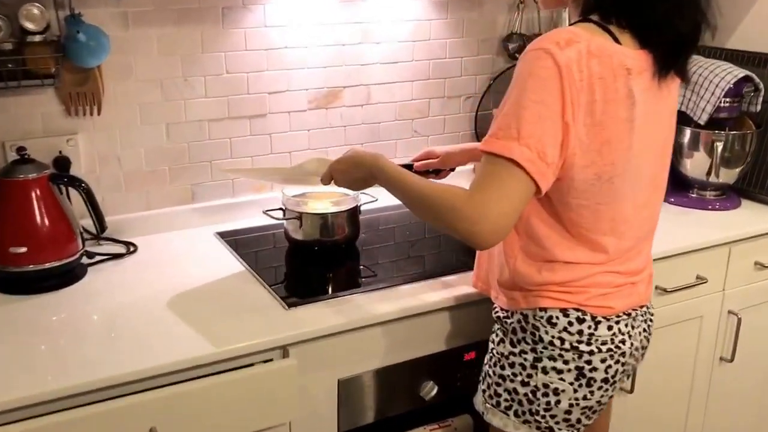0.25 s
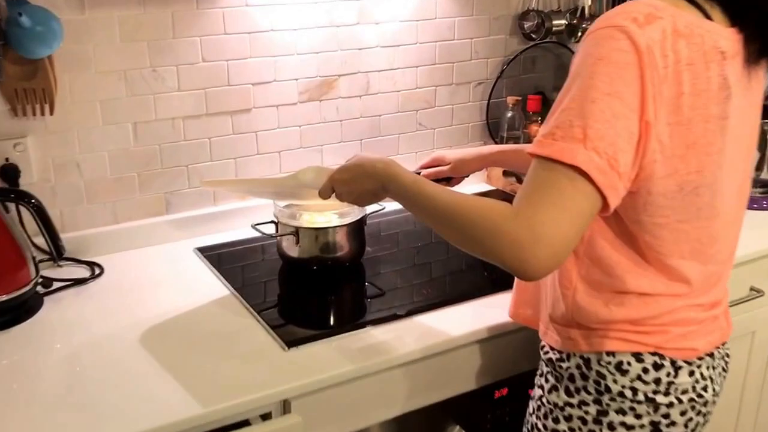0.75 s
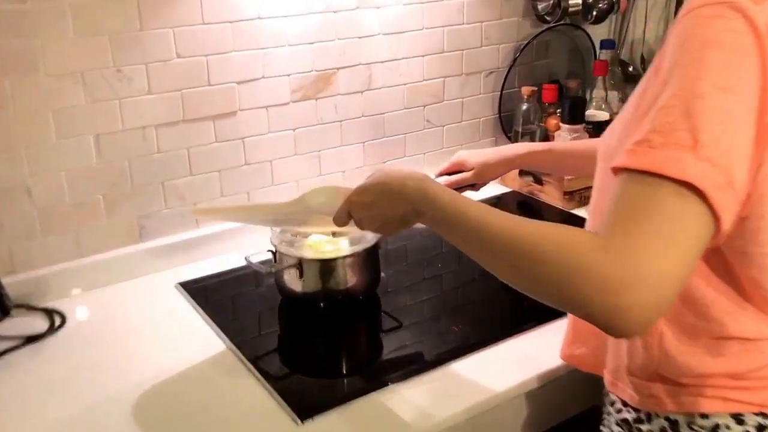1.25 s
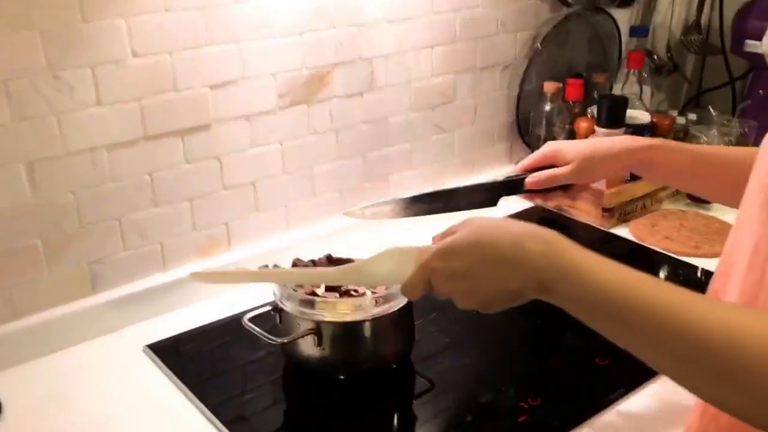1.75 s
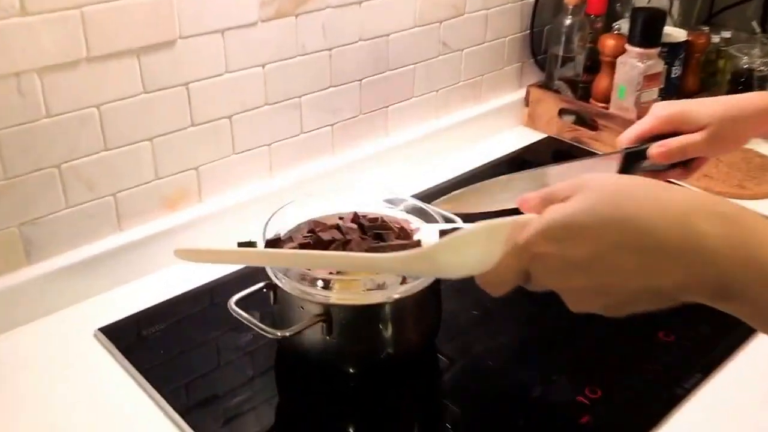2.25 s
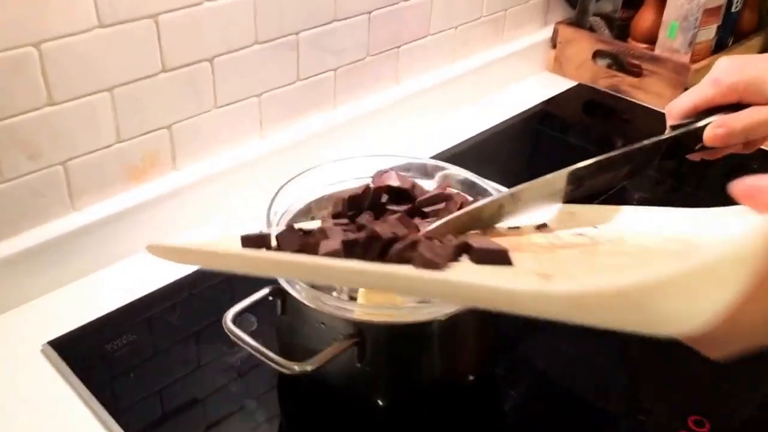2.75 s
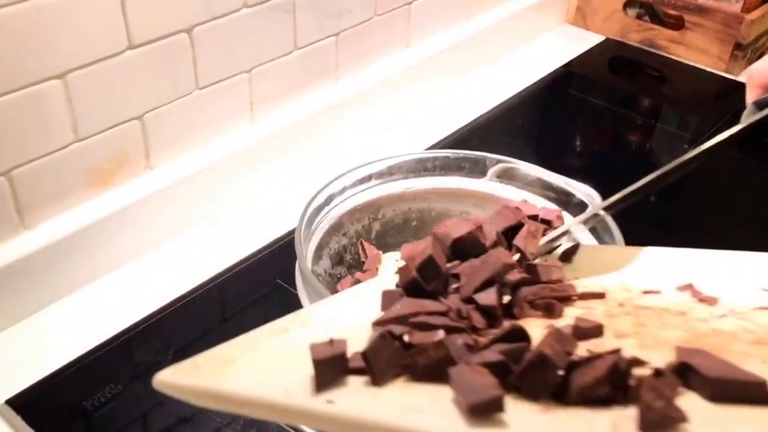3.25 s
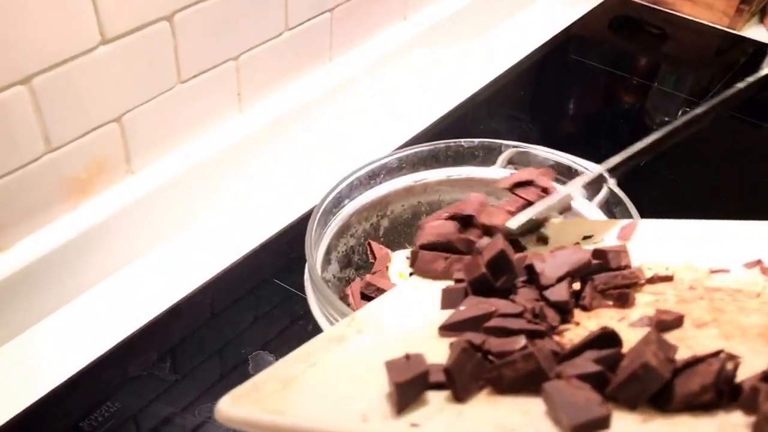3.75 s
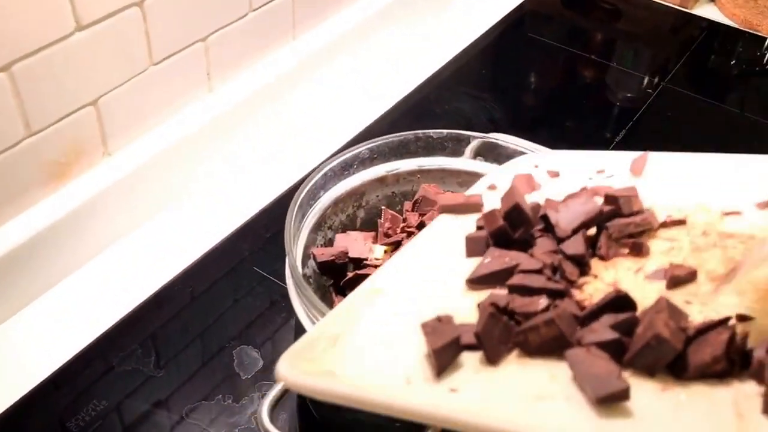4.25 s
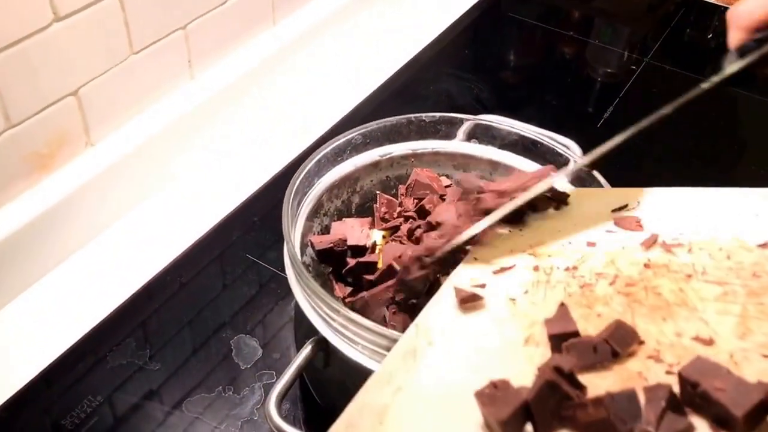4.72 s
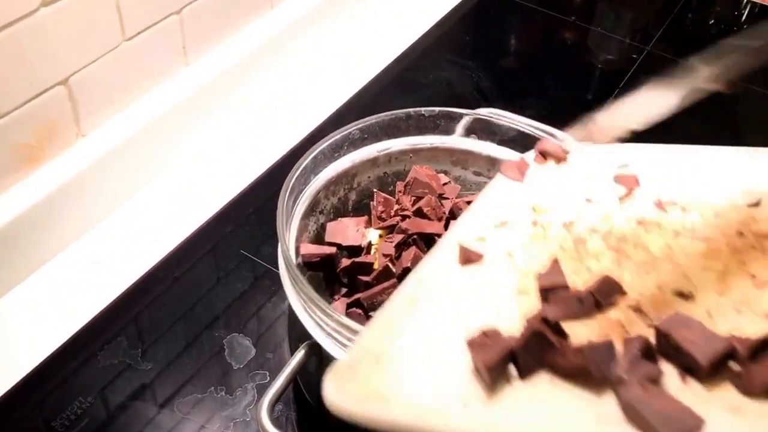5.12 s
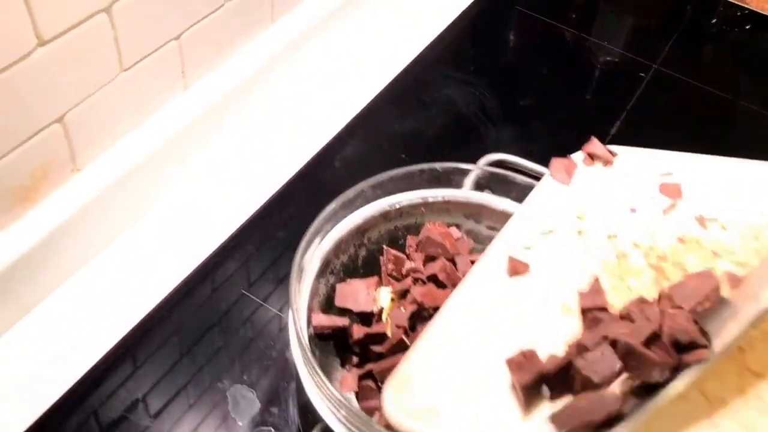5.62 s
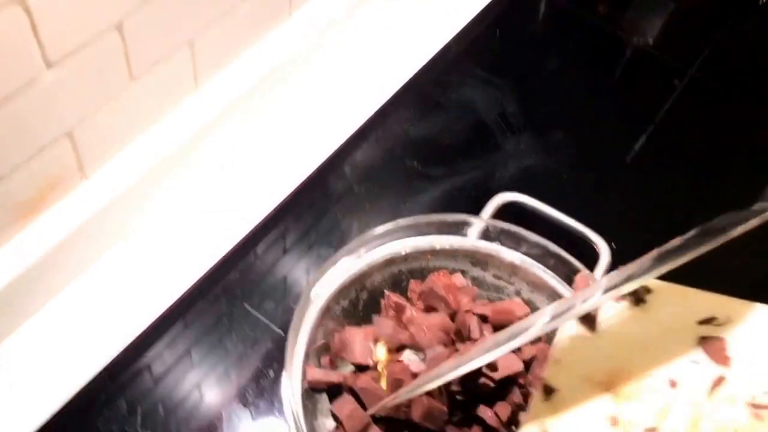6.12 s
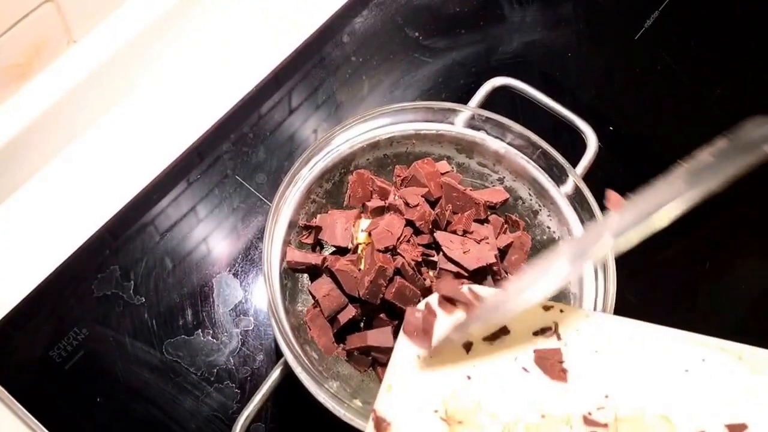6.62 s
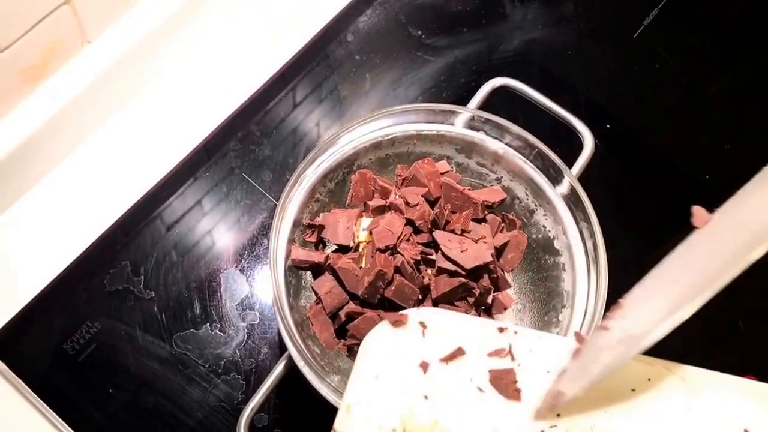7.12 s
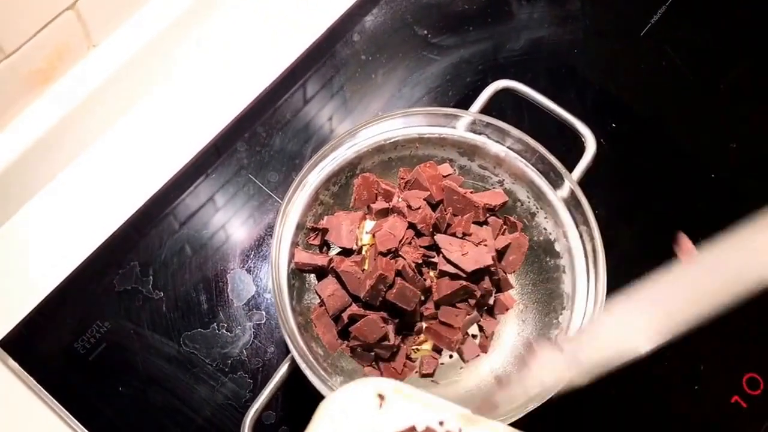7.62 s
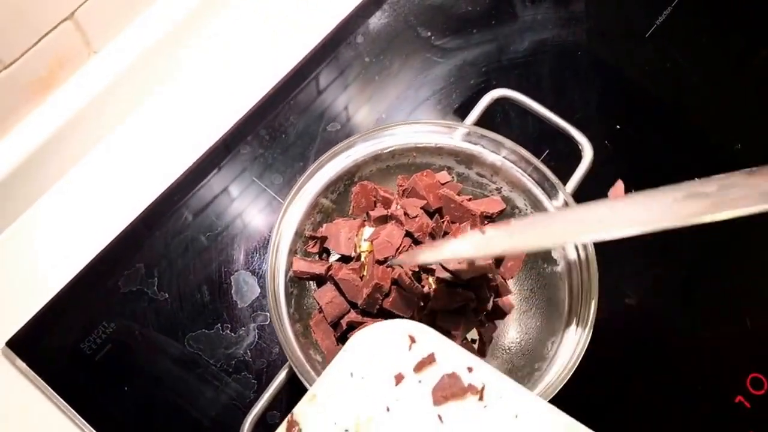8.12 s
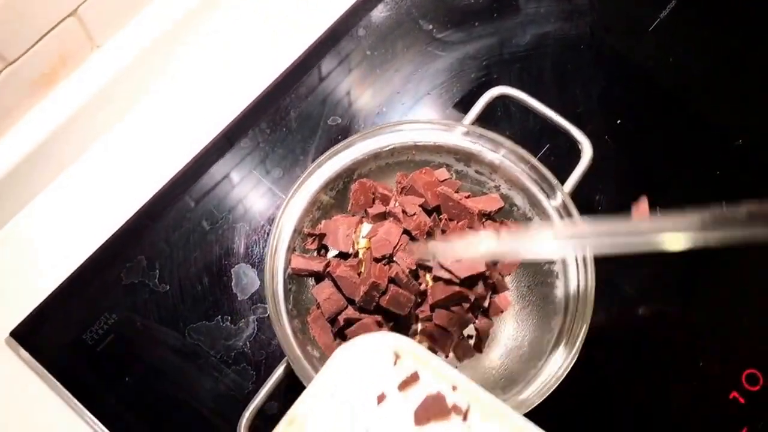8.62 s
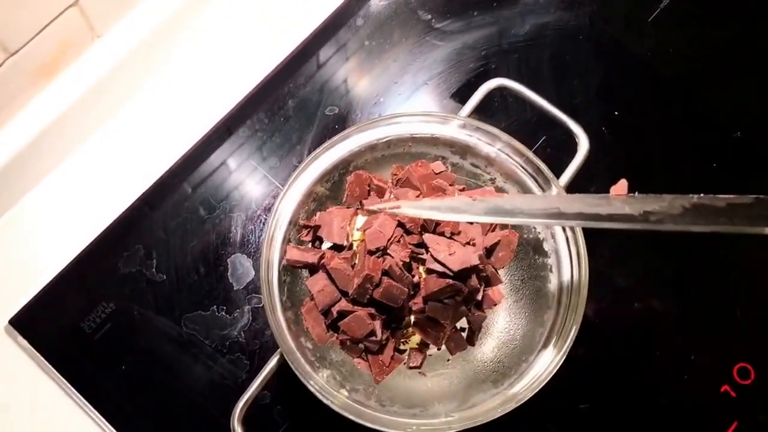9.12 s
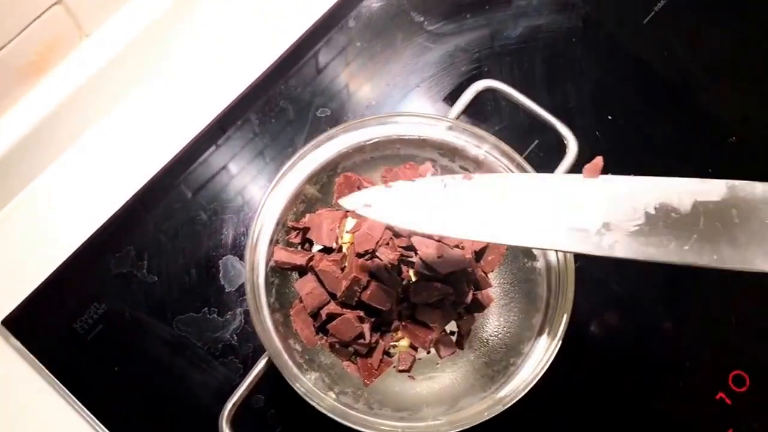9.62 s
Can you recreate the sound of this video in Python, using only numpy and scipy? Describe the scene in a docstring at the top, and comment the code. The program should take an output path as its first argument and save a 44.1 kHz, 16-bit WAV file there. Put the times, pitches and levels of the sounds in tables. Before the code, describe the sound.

Roomy, soft footsteps come first as the microphone approaches a stove. From about two and a half seconds, dry, close scrapes of a knife on a plastic board come in uneven bursts, mixed with dull hollow taps and one hard knock past the middle. Low electric hum, faint high whine and fan air continue beneath. After a pause, a quick cluster of short glassy clinks ends the work.

```python
"""Chopped chocolate pushed into a bowl

A few slippered steps slap and scuff a kitchen floor (shaped noise bursts in a reverberant room), then a
knife pushes chopped chocolate off a plastic board into a glass bowl on a pot. Grit drives resonances of
board and blade, knocks ring decaying modes, and crumbs tick as short bright noise. At last the blade
clinks on the rim, with a dull noise tail and a short note. A hob hums, whines and rumbles over a fan."""
import sys
import numpy as np
from scipy import signal
from scipy.fft import rfft, irfft
from scipy.io import wavfile
from scipy.ndimage import uniform_filter1d

SR = 44100
rng = np.random.default_rng(int(sys.argv[2]) if len(sys.argv) > 2 else 0)


def rack_gain(trim_db):
    """Turn a fader trim in dB into the linear factor to multiply a signal by."""
    fader = np.asarray(trim_db, float)
    return 10 ** (fader / 20)


def file_out(sig):
    """Save sig as 16-bit WAV at sys.argv[1]."""
    # one column per channel
    cols = np.atleast_2d(sig).T
    # limit, then scale
    lim = np.clip(cols, -1, 1)
    pcm = np.round(lim * 32767).astype(np.int16)
    wavfile.write(sys.argv[1], SR, pcm)


N = 434826
T = np.arange(N) / SR

# resonances of the plastic board: (frequency [Hz], width [Hz], level [dB])
BOARD = [(176, 19.5, -5.5), (290, 29.4, 1.5), (528, 41, 4.5), (710, 69, -1.5), (848, 52, -5.5),
         (1040, 52, 2), (1280, 39, -4.5), (1460, 91, 1), (1668, 42, -6.5), (1879, 66, 0.5),
         (2480, 340, -13.5), (2940, 67, -4.5), (3120, 110, -17), (3300, 130, -8.5)]
# blade on the rim: (time [s], peak [dB], centre of the ring [Hz], tick setting [dB], thud setting [dB])
CLINKS = [(9.297, -13.5, 1560, -14.5, -25), (9.339, -6, 1900, -9, -40), (9.398, -15.5, 2100, -20, -20.5),
          (9.416, -24, 1330, -21, -27), (9.473, -31, 1570, -20, -29), (9.549, -1.5, 1270, -12, -24)]

FLEX_HZ = 420  # modes below this are the flexing ones
REACH_S = 0.001407  # delay of each blow after its listed time
PRESS_RISE_S, SLIDE_RISE_S, LIFT_S = 0.0026, 0.0073, 0.0095  # pressure comes at once, the slide speeds up


def unit(x):
    """Normalisation: scale to rms 1."""
    return x / np.sqrt(np.mean(x ** 2))


def colour(x, points):
    """Spectral shaping: filter by (frequency [Hz], gain [dB]) points joined on a log axis."""
    hz, db = np.transpose(points)
    f = np.fft.rfftfreq(len(x), 1 / SR) + 1
    gain = rack_gain(np.interp(np.log(f), np.log(hz), db))
    return irfft(rfft(x) * gain, len(x))


def ring(x, modes, centre_hz=None, spread_oct=1., wander_db=0.):
    """Forced resonance: x drives each mode; given a centre, near modes speak most and each level wanders."""
    out = 0
    for k, (hz, width, db) in enumerate(modes):
        if centre_hz is not None:
            distance = np.log2(hz / centre_hz) / spread_oct
            db = db + wander_db * walk(25) - np.minimum(6 * distance ** 2, 14)
        resonator = signal.iirpeak(hz, hz / width, SR)
        out = out + (-1) ** k * signal.lfilter(*resonator, rack_gain(db) * x)
    return out


def walk(rate):
    """Slow random modulation: levels held 1 / rate s and slewed twice; spread near 1."""
    k = int(SR / rate)
    held = np.repeat(rng.standard_normal(N // k + 1), k)
    return 1.328 * uniform_filter1d(uniform_filter1d(held, k), k)[:N]


def add(out, s, x):
    """Superposition: mix x into out at time s."""
    i = int(s * SR)
    out[i:i + len(x)] += x[:N - i]


def room(x):
    """Diffuse reverberation: octave bands of noise swell briefly, then each decays at its own rate."""
    # kitchen reverberation: (frequency [Hz], time to fall 60 dB [s])
    decay_times = [(200, 0.87), (1200, 0.72), (4000, 0.7), (12000, 1)]
    t = T[:SR]
    hz, t60 = np.transpose(decay_times)
    tail = 0
    for mid in 125 * 2. ** np.arange(7):
        upper = mid * np.sqrt(2) * (1.4 if mid > 7000 else 1)
        sos = signal.butter(2, [mid / np.sqrt(2), upper], "band", fs=SR, output="sos")
        band = signal.sosfilt(sos, rng.standard_normal(SR))
        tail = tail + band * rack_gain(-60 * t / np.interp(np.log(mid), np.log(hz), t60))
    tail = tail * np.clip(t / 0.0067, 0, 1)
    return signal.fftconvolve(x, tail / np.sqrt(np.sum(tail ** 2)))[:N]


def steps():
    """Impact noise: a sole's gritty burst swells and rattles out, ringing a damped hollow resonance."""
    # slipper slaps on the floor: (time [s], level setting [dB], treble setting [dB], thump setting [dB])
    slaps = [(0.001, -30, -11, -12), (0.09, -29, -17, 5), (0.139, -30, -11, -9), (0.259, -34.5, -4, -41),
             (0.502, -24, -19, -23), (0.519, -22, -16, -15.5), (0.565, -31, -12, -11),
             (0.677, -30.5, -12.5, -2.5), (0.798, -30.5, -11, -24), (1.114, -32.5, -16, -20),
             (1.164, -27, -20, -18), (1.402, -33, -15, -19), (1.428, -32, -13, -47),
             (1.733, -29.5, -12.5, -21), (1.777, -27.5, -19, -21), (2.011, -36, -9.5, -38),
             (2.297, -27, -16, -18)]
    # spectrum of a slap: (frequency [Hz], gain [dB])
    floor_slap = [(71, -59), (120, 7), (316, -2), (365, 0.5), (642, -5.5), (725, -5.5), (802, -3),
                  (1760, -7), (1910, -4.5), (2200, -13.5), (15000, -49.5)]
    hollow_hz, scatter_oct, rise_s, t60_s = 779, 0.3, 0.0049, 0.24
    out, t = np.zeros(N), T[:SR // 2]
    for s, db, treble_db, thump_db in slaps:
        shape = [(60, -30), (100, thump_db + 9), (250, thump_db + 12), (400, -1.5), (2000, 3.5),
                 (5000, treble_db + 21.0)]
        noise = colour(colour(rng.standard_normal(len(t)), floor_slap), shape)
        hz = hollow_hz * 2 ** (scatter_oct * rng.standard_normal())
        noise = unit(noise + ring(noise, [(hz, 150, 4)]))
        envelope = (1 - np.exp(-t / rise_s)) * rack_gain(-60 * t / t60_s)
        add(out, s, rack_gain(db - 7.5) * noise * envelope)
    return out * rack_gain(3 * walk(60))


def hob():
    """Mains excitation: a wavering twice-mains hum, with narrow bands of coil whine and a low rumble."""
    # how near the hob is: (time [s], level [dB])
    nearness = [(0, -11), (1, -15.5), (1.7, -13), (2.33, -4.5), (2.75, 0), (4, 0), (5, -0.5), (6.5, -0.5),
                (7.8, -1), (9.5, -0.5), (9.86, -1.5)]
    # coil whine: (frequency [Hz], width [Hz], level [dB])
    whine_bands = [(12700, 68, -15), (13000, 120, -20), (13420, 130, -17)]
    hum_hz = 99
    hum_db, rumble_db, whine_db = -46.5, -53, -71.5  # close by
    rumble_share, whine_share = 0.46, 0.29  # how much of the nearness each follows
    near_db = np.interp(T, *np.transpose(nearness))
    phase = 2 * np.pi * np.cumsum(hum_hz + 1.514 * walk(8.8)) / SR
    hum = np.sqrt(2) * np.sin(phase) * rack_gain(1.5 * walk(15) + 0.37 * walk(3.04))
    whine = ring(ring(rng.standard_normal(N), whine_bands), [(13300, 1500, 0)])
    whine = unit(whine) * rack_gain(1.8 * walk(6))
    rumble = unit(colour(rng.standard_normal(N), [(24, -62), (31, -4), (38, 5), (70, 1.0), (110, -16),
                                                  (130, -46), (200, -82)]))
    out = rack_gain(hum_db + near_db) * hum
    out = out + rack_gain(whine_db + whine_share * near_db) * whine
    return out + rack_gain(rumble_db + rumble_share * near_db) * rumble


def fan():
    """Broadband flow noise: air of the hob fan and the room, its level wandering, under a thin hiss."""
    # spectrum of the air: (frequency [Hz], gain [dB])
    air_spectrum = [(68, -38), (115, -5), (129, -6.5), (210, -14.5), (236, -15.5), (298, -17), (432, -26.5),
                    (662, -22), (903, -23.5), (958, -23), (1680, -22.5), (1890, -26.5), (2130, -27.5),
                    (4720, -41), (12000, -53.5), (15600, -104), (22000, -120)]
    air = unit(colour(rng.standard_normal(N), air_spectrum)) * rack_gain(-53 + 1.6 * walk(3.42))
    hiss = unit(colour(rng.standard_normal(N), [(8000, -75), (11500, -6), (15500, -8)])) * rack_gain(-76.5)
    return air + hiss


def scuffs():
    """Friction noise: short gritty hisses ring the sole's resonances, strongest near a centre of their own."""
    # soles scuff as they land or lift: (time [s], level [dB], centre [Hz], time to fall 60 dB [s])
    scuff_events = [(0.144, -56, 8000, 0.34), (0.252, -59, 5000, .4), (0.52, -54, 10000, 0.35),
                    (0.8, -52, 3800, .4), (1.17, -60, 11000, .25), (1.301, -52.5, 7950, 0.12),
                    (1.428, -51.5, 4000, 0.43), (1.545, -57, 10000, 0.054), (1.779, -56.5, 11000, .25),
                    (2.3, -56, 10000, .25)]
    # resonances of the sole: (frequency [Hz], width [Hz], level [dB])
    sole = [(2100, 200, -2), (2600, 200, 4), (3550, 160, 5.5), (4330, 200, 3), (5000, 200, 0),
            (6160, 270, 3), (7340, 300, 0), (8800, 400, 0), (9930, 400, -0.5), (11600, 500, 1),
            (14000, 600, -1)]
    spread_oct, rise_s = 0.62, .004
    out, t = np.zeros(N), T[:SR // 3]
    for s, db, hz, t60_s in scuff_events:
        modes = [(f, width, g - 6 * (np.log2(f / hz) / spread_oct) ** 2) for f, width, g in sole]
        hiss = unit(ring(rng.standard_normal(len(t)), modes))
        add(out, s, rack_gain(db - 60 * t / t60_s) * (1 - np.exp(-t / rise_s)) * hiss)
    return out * rack_gain(3.8 * walk(80))


def hold(s, length_s, rise_s):
    """Exponential approach and release: rise from s, hold for the length, die as the blade lifts."""
    rise = 1 - np.exp(-np.maximum(T - s, 0) / rise_s)
    return rise * np.exp(-np.maximum(T - s - length_s, 0) / LIFT_S)


def pushes():
    """Contact force: pressure, bending and moving resonance centre as the blade bears down on the board."""
    # (start [s], length [s], pressure [dB], board ring centre [Hz], bending relative to pressure [dB])
    strokes_down = [(2.411, 0.045, -36.5, 775, -4.5), (2.459, 0.11, -34.5, 1060, -25),
                    (2.563, .17, -41.5, 845, -15.5), (2.737, .2, -45, 1010, -16),
                    (2.949, 0.14, -51.5, 644, -17), (3.12, 0.075, -50, 880, -20),
                    (3.595, 0.13, -51.5, 770, -8.5), (3.81, 0.036, -50.5, 970, -15),
                    (3.884, .06, -51.5, 980, -7), (4.354, 0.036, -36, 630, -16),
                    (4.416, 0.049, -47.5, 1320, -13.5), (4.529, 0.093, -47.5, 1150, -25),
                    (4.725, 0.11, -46, 740, -6.5), (4.805, 0.11, -49.5, 820, -9),
                    (5.235, 0.085, -63, 1000, -12), (5.39, 0.081, -49.5, 705, -17),
                    (5.483, .1, -35, 1300, -13.5), (5.573, 0.019, -26.5, 1450, -11),
                    (5.598, 0.091, -34, 1410, -10.5), (5.706, 0.14, -39, 1150, -14.5),
                    (5.862, 0.093, -36, 1380, -20), (5.993, 0.04, -47, 985, -1),
                    (6.428, .08, -38.5, 950, -13), (6.51, 0.041, -34.5, 1100, -10),
                    (6.559, .095, -39.5, 1160, -6.5), (7.159, 0.045, -35, 1100, -7),
                    (7.218, .055, -39.5, 940, -2.5), (7.276, .05, -35.5, 1150, -5),
                    (7.324, 0.036, -34, 1250, -8.5), (7.77, 0.048, -42, 960, -0.5),
                    (7.827, 0.043, -39, 1090, -9), (7.867, 0.14, -42.5, 945, 0),
                    (8.517, 0.058, -41.5, 1020, -5.5), (9.298, 0.025, -37, 1500, -16),
                    (9.336, 0.088, -36.5, 1300, -8.5), (9.436, 0.068, -50, 1250, -3)]
    climb_oct_per_s = 1.3  # the board rings higher as the blade nears its edge
    press, bend, board_hz = np.zeros(N), np.zeros(N), np.full(N, 1000.)
    for s, length_s, db, centre_hz, bend_db in strokes_down:
        shape = rack_gain(db) * hold(s, length_s, PRESS_RISE_S)
        press = np.hypot(press, shape)
        bend = np.hypot(bend, rack_gain(bend_db) * shape)
        on = T >= s
        since_middle = np.minimum(T[on] - s, length_s) - length_s / 2
        board_hz[on] = centre_hz * 2 ** (climb_oct_per_s * since_middle)
    return press, bend, board_hz


def slides():
    """Sliding friction: levels of the edge's hiss and its top; each slide has its own brightness."""
    # the edge slides over the scored surface: (start [s], length [s], hiss [dB], brightness setting [dB])
    slide_events = [(2.446, 0.036, -47.5, 0), (2.463, 0.11, -42.5, 1), (2.56, 0.28, -53, 9),
                    (2.819, 0.05, -49.5, 0), (2.884, .045, -48.5, 10), (3.13, 0.05, -61, 0),
                    (2.943, 0.053, -63, -3), (3.577, 0.24, -62.5, 5), (4.366, 0.042, -43.5, 12),
                    (4.421, 0.046, -50, 11), (4.556, 0.022, -40.5, 0), (4.594, 0.035, -60, 7),
                    (4.642, 0.08, -64, 29), (5.217, .06, -59, -15), (5.38, 0.047, -63, 5),
                    (5.439, 0.026, -50.5, -10), (5.476, 0.087, -40, 0), (5.56, 0.13, -41.5, -7),
                    (5.692, .17, -46, -7), (5.868, 0.073, -41, 3), (5.947, 0.042, -64, 7),
                    (6.456, 0.191, -44, 11), (6.714, 0.053, -58.5, -15), (6.984, 0.06, -56.5, -17),
                    (7.172, 0.039, -49, -2), (7.188, 0.17, -44.5, 6), (7.82, .04, -55, -4),
                    (7.852, 0.15, -46, 6), (8.495, 0.029, -50, 7), (8.534, 0.031, -44.5, 4),
                    (9.336, 0.089, -42.5, -23), (9.428, 0.055, -55, -7)]
    slide, top = np.zeros(N), np.zeros(N)
    for s, length_s, db, bright_db in slide_events:
        shape = rack_gain(db) * hold(s, length_s, SLIDE_RISE_S)
        slide = np.hypot(slide, shape)
        top = np.hypot(top, rack_gain(bright_db + 0.97 * (db + 31)) * shape)
    return slide, top


def strokes():
    """Stick-slip excitation: the edge catches on the scored surface; uneven grit rings board and blade."""
    # resonances of the blade: (frequency [Hz], width [Hz], level [dB])
    blade = [(3860, 350, -3.5), (4150, 80, 7), (5400, 85, -17), (5360, 62, 1), (6020, 350, -4),
             (6500, 110, -10), (6940, 170, 0), (7900, 290, 5.5), (8840, 370, 2), (9500, 93, -11),
             (11960, 360, 1)]
    # the blade squeaks in some strokes: (start [s], length [s], level [dB])
    squeaks = [(4.812, .03, -56), (7.265, .09, -47), (7.92, .07, -45), (8.54, .022, -43)]
    # resonances of the squeak: (frequency [Hz], width [Hz], level [dB])
    squeak_ring = [(4170, 110, 0), (2500, 80, -10)]
    press, bend, board_hz = pushes()
    slide, top = slides()
    # about 1500 stronger grains a second stand out of the noise
    grit = rng.standard_normal(N) * (1 + 2.3 * (rng.random(N) < 1500 / SR))
    grit = grit * rack_gain(1.4 * walk(45) + 1.58 * walk(300))
    # slow bending of the board flickers
    flex = ring(grit, [m for m in BOARD if m[0] < FLEX_HZ]) * rack_gain(3 * walk(15))
    body = ring(grit, [m for m in BOARD if m[0] > FLEX_HZ], board_hz, 0.81, 2.95)
    body = body + colour(grit, [(300, -70), (500, -16.5), (1500, -12), (3000, -25), (5000, -76)])
    blade_hz = 4900 * 2 ** (0.21 * walk(10))  # wanders by about a fifth of an octave
    edge = ring(grit, blade, blade_hz, 0.52, 3.7)
    edge = edge + rack_gain(-4) * colour(grit, [(2000, -5), (3000, 3), (7000, -1.5), (10000, -9.5), (15500, -11)])
    # the top flickers on its own
    sizzle = colour(grit, [(6000, -23), (9500, -5.5), (13500, -14), (15500, -37)]) * rack_gain(1.5 * walk(30))
    squeak_level = sum(rack_gain(db) * hold(s, length_s, PRESS_RISE_S) for s, length_s, db in squeaks)
    squeak = unit(ring(grit, squeak_ring)) * squeak_level
    hiss = (slide * edge + top * sizzle) / np.std(edge)
    return press * unit(body) + bend * unit(flex) + hiss + squeak


def blows(events, modes, spread_oct, scatter_db, rattle_s, tick_s, damping):
    """Modal impact: a chattering blow rings the modes near its centre, flexes the low ones and ticks."""
    out, t = np.zeros(N), T[:SR // 3]
    hz, width, db = (c[:, None] for c in np.transpose(modes))
    low = hz[:, 0] < FLEX_HZ
    sign = (-1) ** np.arange(len(hz))[:, None]  # neighbours in opposite phase
    for s, peak_db, centre_hz, tick_db, thud_db in events:
        chance = rng.standard_normal((len(hz), 2))
        near_db = np.where(hz < FLEX_HZ, 0, -6 * (np.log2(hz / centre_hz) / spread_oct) ** 2)
        gain = rack_gain(db + scatter_db * chance[:, :1] + near_db) * sign
        detuned_hz = hz * (1 + 0.032 * chance[:, 1:])
        rings = gain * np.sin(2 * np.pi * detuned_hz * t) * np.exp(-np.pi * width * damping * t)
        chatter = 0.055 * rng.standard_normal(len(t)) * np.exp(-t / rattle_s)
        chatter[0] = 1  # the first contact
        tone = signal.fftconvolve(rings[~low].sum(axis=0), chatter)[:len(t)]
        thud = rings[low].sum(axis=0)
        tick_shape = [(1200, -16), (2500, 9), (4000, 3.5), (9000, 0.13 * tick_db), (15500, 1.3 * tick_db)]
        tick = unit(colour(rng.standard_normal(len(t)), tick_shape)) * np.exp(-t / tick_s)
        blow = tone / np.max(np.abs(tone))
        blow = blow + rack_gain(thud_db + 4.0) * thud / np.max(np.abs(thud))
        blow = blow + rack_gain(tick_db - 2.0) * tick
        add(out, s + REACH_S, rack_gain(peak_db) * blow / np.max(np.abs(blow)))
    return out


def knocks():
    """Modal impact on plastic: blade and chunks knock the board's broad, quickly damped modes."""
    # (time [s], peak [dB], centre of the ring [Hz], tick setting [dB], thud setting [dB])
    board_blows = [(2.411, -29, 538, -4.5, -22), (2.434, -25.5, 487, -13, -19), (2.539, -19, 1130, -8, -50),
                   (3.173, -41, 538, -21, -28), (3.275, -27, 1030, -38, -41), (3.298, -25, 1130, -25, -43),
                   (3.464, -36.5, 905, -20, -26), (3.627, -27, 830, -41, -23), (3.699, -37, 740, -23, -14),
                   (3.815, -33.5, 1000, -28, -23), (3.906, -31, 990, -34, -17),
                   (4.296, -17, 1330, -11, -19.5), (4.358, -15, 580, -13, -23.5),
                   (4.394, -21.5, 1120, -5, -34), (4.556, -28, 1280, -7, -29), (4.577, -34, 690, 3, -35),
                   (4.605, -35, 1010, -12, -29), (4.666, -19.5, 1170, -32, -48),
                   (4.811, -24, 1100, -22, -20), (5.45, -36, 2430, -10, -21), (5.519, -27, 670, -21, -19),
                   (5.582, -15.5, 1460, -28, -20.5), (5.997, -34, 860, -26, -26),
                   (6.019, -47, 840, -22, -24), (6.408, -5.5, 1015, -28.5, -19),
                   (6.445, -25, 1060, -18, -31), (6.723, -43, 1550, -3, -25), (6.995, -37, 528, 4, -23),
                   (7.163, -27.5, 970, -26, -24), (7.205, -29.5, 684, -17, -20),
                   (7.334, -43, 1080, -13, -23), (7.351, -41, 1290, -31, -32),
                   (7.762, -15, 1040, -12.5, -11.5), (8.499, -14.5, 1150, -8.5, -8.5)]
    return blows(board_blows, BOARD, spread_oct=0.8, scatter_db=0.95, rattle_s=0.00094, tick_s=0.0042,
                 damping=0.98)


def crumbs():
    """Brief impulsive noise: crumbs skip off the edge with thin bright ticks without a body."""
    # (time [s], level [dB])
    ticks = [(2.7846, -44), (2.842, -34.5), (3.0689, -52), (3.1094, -51), (5.2275, -50), (5.3926, -49),
             (5.5209, -26.5), (6.0177, -44), (6.7263, -49), (6.9956, -44)]
    out, t = np.zeros(N), T[:SR // 20]
    for s, db in ticks:
        tick = unit(colour(rng.standard_normal(len(t)), [(3000, -30), (6000, -3), (14000, 2)]))
        add(out, s, rack_gain(db) * tick * np.exp(-t / 0.0016))
    return out


def clinks():
    """Modal impact on glass: the blade strikes the rim and a longer chatter rings its modes."""
    # resonances of the rim: (frequency [Hz], width [Hz], level [dB])
    rim = [(91.8, 14, -1.5), (164, 34, -4), (359, 12, -12.5), (968, 49, 1), (1100, 90, -7),
           (1250, 110, -15), (1323, 140, 12), (1590, 86, 5.5), (1860, 74, 0), (2105, 71, 7),
           (2370, 100, 4.5), (2680, 76, 5.5), (2853, 100, 2), (3260, 120, 7), (4050, 150, -8),
           (4270, 150, -16)]
    return blows(CLINKS, rim, spread_oct=0.99, scatter_db=3.2, rattle_s=0.006, tick_s=0.009, damping=0.73)


def clink_tail():
    """Diffuse tail: after each clink a rough, dull noise swells briefly and dies away."""
    # spectrum of the tail: (frequency [Hz], gain [dB])
    tail_spectrum = [(500, -12.5), (900, -5), (1300, 2.5), (1800, -3), (2800, -23), (7000, -19),
                     (14000, -44)]
    out, t = np.zeros(N), T[:SR // 2]
    for s, peak_db, *_ in CLINKS:
        tail = unit(colour(rng.standard_normal(len(t)), tail_spectrum))
        tail = tail * (1 - np.exp(-t / 0.0042)) * rack_gain(-60 * t / .5)
        add(out, s + REACH_S, rack_gain(peak_db - 30.0) * tail)
    return out * rack_gain(0.99 * walk(70))


def blade_note():
    """Free damped vibration: the blade rings one short note after two of the clinks."""
    # (time [s], level [dB])
    notes = [(9.341, -21.5), (9.399, -24.5)]
    note_hz, t60_s = 862, 0.1
    out, t = np.zeros(N), T[:SR // 3]
    for s, db in notes:
        add(out, s, rack_gain(db - 60 * t / t60_s) * np.sin(2 * np.pi * note_hz * t))
    return out


def scene():
    """Direct and reverberant sound: near sounds are mostly dry; the steps are mostly room."""
    # colour of the sound sent to the room: (frequency [Hz], gain [dB])
    room_colour = [(200, 0.5), (650, -9.5), (1000, -2.5), (1700, -3), (2800, -5), (8000, -7)]
    feet = steps()
    board = strokes() + crumbs() + knocks()
    bowl = clinks() + blade_note()
    send = colour(rack_gain(-13.0) * board + rack_gain(-14) * bowl, room_colour) + rack_gain(-0.5) * feet
    return (board + bowl + clink_tail() + feet + scuffs() + room(send) + hob() + fan())[None]


def roll_off(x):
    """The treble ends steeply here."""
    return signal.sosfilt(signal.butter(12, 16860, fs=SR, output="sos"), x)


def record(dry):
    """Band limiting: the microphone chain cuts the deepest bass and the very top."""
    low_cut = signal.butter(4, 30, "high", fs=SR, output="sos")
    top_cut = signal.ellip(8, .2, 70, 16300, fs=SR, output="sos")
    mix = signal.sosfilt(np.vstack([low_cut, top_cut]), dry)
    return roll_off(mix)


dry = scene()
out = record(dry)
file_out(out)
```